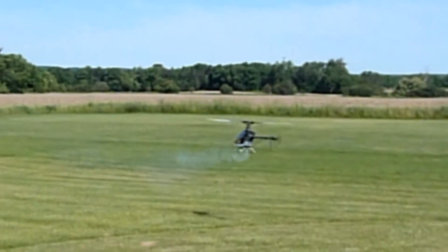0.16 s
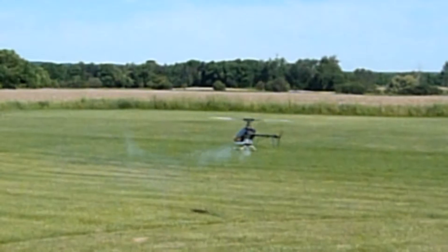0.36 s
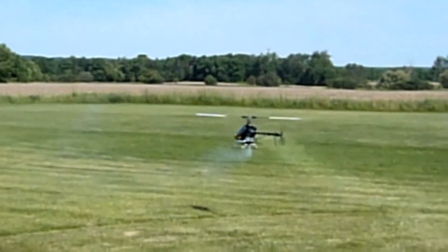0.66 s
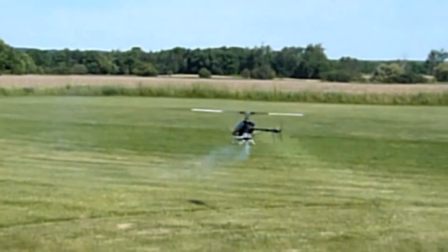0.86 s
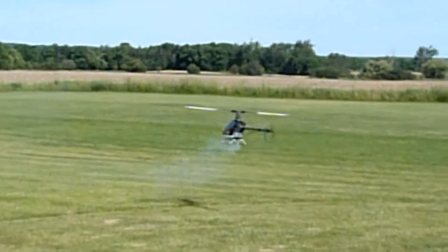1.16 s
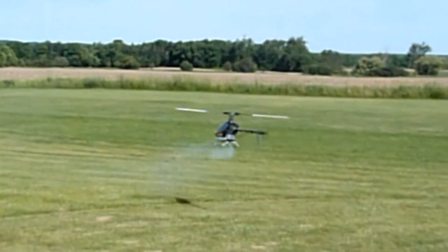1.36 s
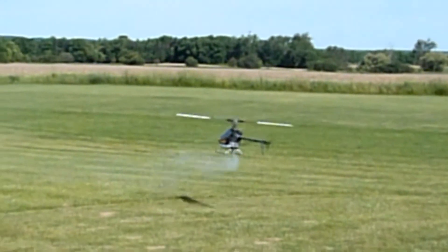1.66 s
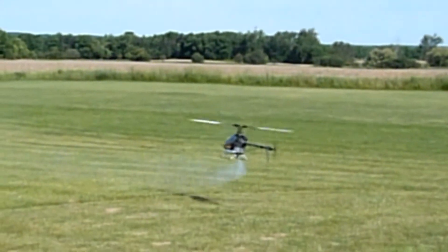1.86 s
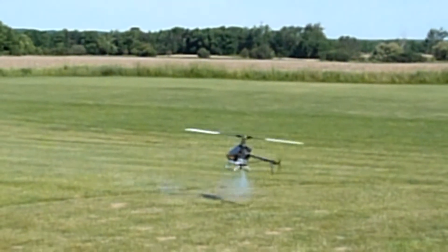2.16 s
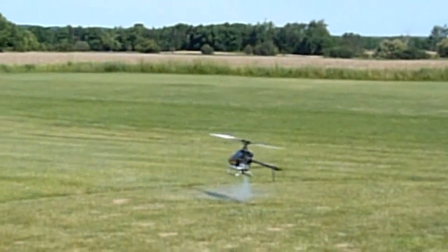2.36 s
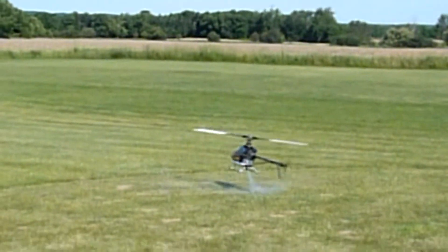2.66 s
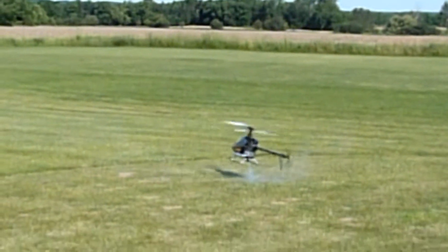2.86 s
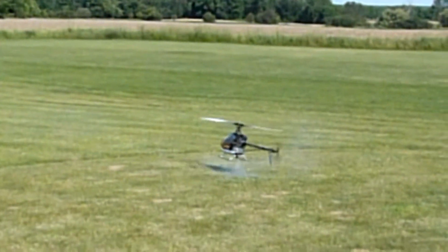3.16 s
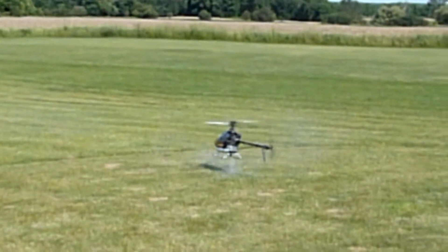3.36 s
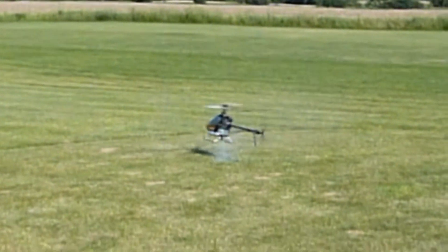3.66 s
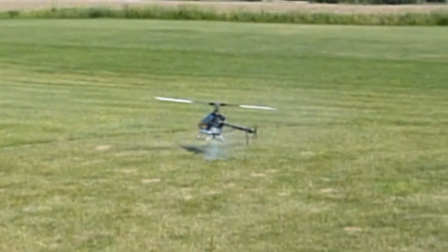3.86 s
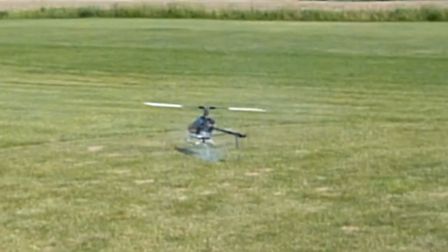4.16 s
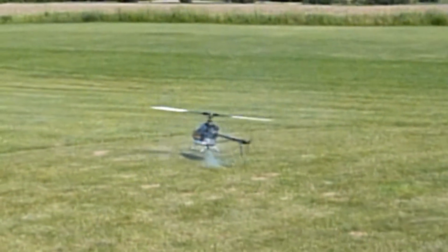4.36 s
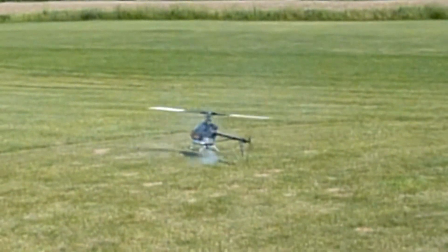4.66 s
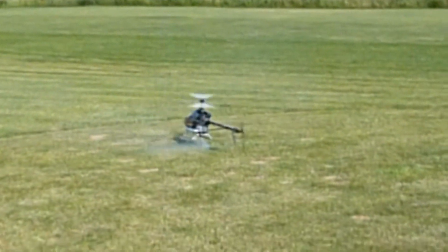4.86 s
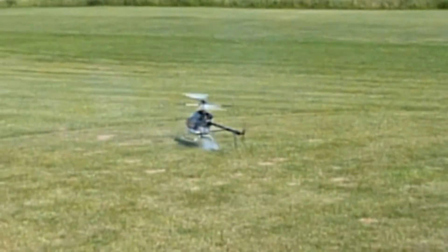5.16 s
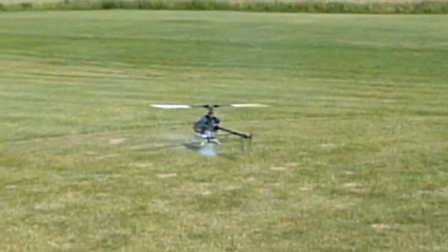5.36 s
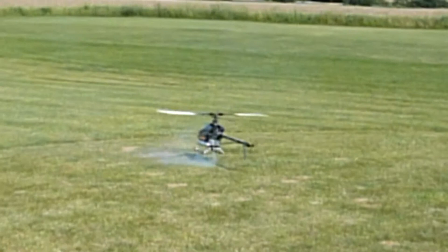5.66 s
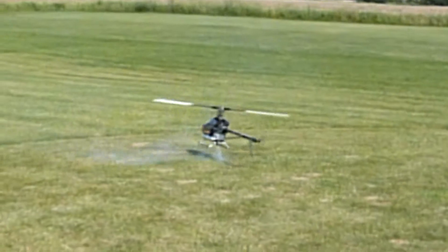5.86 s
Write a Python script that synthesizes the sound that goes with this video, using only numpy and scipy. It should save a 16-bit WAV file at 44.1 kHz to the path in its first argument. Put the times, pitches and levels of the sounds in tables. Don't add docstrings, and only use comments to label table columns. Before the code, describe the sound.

On an open grass field a model helicopter sinks to a low hover. Its small two-stroke holds a nearly constant buzzing drone with a piercing gear whine and bright blade hiss. Gusts rumble, flutter and pop right on the small stereo microphone, heavily for nearly three seconds, then dropping away and returning in shorter bouts. The hiss swells late as the craft turns.

```python
import sys
import numpy as np
from scipy import signal
from scipy.fft import rfft, irfft, next_fast_len
from scipy.io import wavfile
from scipy.ndimage import uniform_filter1d, map_coordinates

SR = 44100
rng = np.random.default_rng(int(sys.argv[2]) if len(sys.argv) > 2 else 0)


def wrap_up_sound(samples):
    columns = np.atleast_2d(samples).T
    tamed = np.clip(columns, -1, 1)
    steps = np.round(tamed * 32767).astype(np.int16)
    wavfile.write(sys.argv[1], SR, steps)


def volts(x):
    e = np.asarray(x, float) / 20
    return 10 ** e


N = 264851
TIME = np.arange(N) / SR
GEAR_RATIO = 8.5


def unit(x):
    return x / np.sqrt(np.mean(x ** 2) + 1e-20)


def along(points, hz):
    f, v = np.transpose(points)
    return np.interp(np.log(hz + 1), np.log(f + 1), v)


def curves(rows):
    s, *cols = np.transpose(rows)
    return [np.interp(TIME, s, c) for c in cols]


def wobble(rate):
    knots = rng.standard_normal(int(N * rate / SR) + 4)
    return map_coordinates(knots, [TIME * rate], order=2)


def filtered(x, response):
    m = next_fast_len(N + 8192)
    spectrum = rfft(x, m) * response(np.fft.rfftfreq(m, 1 / SR))
    return irfft(spectrum, m)[..., :N]


# time in seconds, engine speed in turns per second.
ENGINE_SPEED = [(0, 234.3), (.25, 235.5), (.5, 236.2), (.75, 237), (1, 237.9), (1.25, 238.8), (1.6, 239.2),
                (2.2, 239.6), (2.7, 239.2), (3, 240), (3.8, 240.4), (4.3, 240.5), (4.5, 240.2),
                (4.9, 240.6), (5.25, 240), (5.6, 240.3), (6, 240.7)]
# time in seconds, nearness to the grass from 0 (high) to 1 (low hover).
NEARNESS = [
    (0, 0),
    (1.5, 0.11),
    (2.2, 0.3),
    (3, 0.79),
    (4, 0.94),
    (6, 1),
]
# time in seconds, loudness in dB, # gear load in dB, throttle
# in dB.
CRAFT_LEVEL = [(0, -49, 5, -1), (.22, -44.5, 5.5, -2), (.42, -47, 5, -2), (1.02, -44.5, 1.5, -0.9),
               (1.55, -47.5, 1, 0.5), (1.87, -45, 5, 0), (2.07, -43.5, .3, 2), (2.55, -48, 2.5, 1.5),
               (3.47, -40.5, -2, -3), (3.64, -44, -1, -0.3), (3.9, -40, 0, -0.1), (4.17, -43.5, -3, .3),
               (4.45, -39, -3, -2.5), (4.66, -40.5, 1.5, -4), (5.12, -34.5, 2, -0.5),
               (5.27, -42, -1, -1.5), (5.55, -44, 4.5, -1), (5.95, -35.5, -5.5, 1)]


def helicopter():
    turn = 2 * np.pi * np.cumsum(curves(ENGINE_SPEED)[0]) / SR
    near = np.clip(curves(NEARNESS)[0], 0, 1)
    hiss_db, gear_db, throttle_db = curves(CRAFT_LEVEL)
    engine_db = -47 + 0.54 * (hiss_db + 44.5) + 2 * near + throttle_db + 0.29 * wobble(9.9)
    whine_db = hiss_db + gear_db + 0.74 * wobble(10)
    rising_db = engine_db + wobble(7) - 8.5 + 11.5 * near
    hiss_db = hiss_db + 0.72 * wobble(11)

    drag = np.cos(turn / GEAR_RATIO + 1.25 + 0.3 * wobble(3))
    shake = backlash(drag, near)
    tones = exhaust(turn, near) + volts(engine_db + 1.0) * engine_orders(turn, near, drag)
    tones = tones + volts(whine_db - 1.15) * gear_whine(turn, near, shake)
    tones = tones + volts(rising_db) * rising_order(turn, shake)

    noise = volts(engine_db - 3.0) * (0.46 + 0.61 * near) * stutter(turn)
    noise = noise + volts(hiss_db + 2) * hiss(turn, near)
    return tones * volts([[-0.3], [0.3]]) + grass(noise, loss_db=-9, soft_hz=5030)


# time in seconds, level in dB.
EXHAUST_LEVEL = [
    (0, -36.5),
    (2.9, -45),
    (3.15, -40.5),
    (4.7, -37),
    (5.1, -33),
    (5.3, -36),
    (5.6, -39),
    (5.9, -34.5),
    (6, -35.5),
]


def exhaust(turn, near):
    return volts(curves(EXHAUST_LEVEL)[0]) * lines(slice(0, 3), turn, near, 0.04 * wobble(30), sway_db=0.8)


def engine_orders(turn, near, drag):
    return lines(slice(3, 13), turn, near, 0.06 * drag + 0.02 * wobble(9), sway_db=1.2)


def backlash(drag, near):
    return (0.08 - 0.045 * near) * drag + (0.04 + 0.035 * near) * wobble(45) + 0.035 * wobble(170)


def gear_whine(turn, near, shake):
    depth = 0.38 - 0.1 * near + 0.08 * wobble(2.5)
    beat = 1 + depth * np.cos(turn / GEAR_RATIO + 1.25)
    return beat * volts(1.6 * wobble(120)) * lines(slice(13, None), turn, near, shake, sway_db=1.5)


def rising_order(turn, shake):
    return volts(3 * wobble(60)) * np.sin(21 * (turn + 0.5 * shake + 0.075 * wobble(60)))


TONE_MULTIPLES = [1, 2, 3, 4, 5, 6, 7, 8, 9, 81 / 8.5, 10, 11, 12, 15, 16, 17, 18, 20, 22, 23]
# level in dB when high, level in dB when low.
TONE_LEVELS = [(-43, -36), (-54, -47), (-56, -49), (-59, -62), (-52, -56), (-65, -60), (-52, -46),
               (-66, -60), (-65, -51), (-62, -49), (-60, -56), (-67, -59), (-74, -65), (-60, -60),
               (-60, -52), (-67, -58), (-72, -62), (-46, -44), (-60, -57), (-63, -55)]


def lines(part, turn, near, wander, sway_db):
    total, power = 0, 0
    for k, (high_db, low_db) in zip(TONE_MULTIPLES[part], TONE_LEVELS[part]):
        size = volts(high_db + (low_db - high_db) * near)
        tone = np.sin(k * (turn + wander) + rng.uniform(0, 2 * np.pi))
        total = total + size * volts(sway_db * wobble(9)) * tone
        power = power + size ** 2 / 2
    return total / np.sqrt(power)


# multiple of engine speed, level in dB when low.
UNEVEN_FIRING = [(1.5, -14.5), (2.5, -8), (4.5, -17), (5.5, -7), (6.5, -7), (7.5, -7), (11.5, -9.5),
                 (12.5, -14.5), (15.5, -13), (17.5, -26)]


def stutter(turn):
    total = 0
    for k, db in UNEVEN_FIRING:
        rate = 20 + 4 * k
        total = total + volts(db) * (wobble(rate) * np.sin(k * turn) + wobble(rate) * np.cos(k * turn))
    return total


# frequency in Hz, density in dB per Hz.
HISS_WHEN_HIGH = [(60, -29), (300, -9), (900, -3.5), (1700, 1), (2000, -4), (2400, -5.5), (3200, -11.5),
                  (3700, -8), (4450, -1.5), (5300, 4.5), (5700, -8.5), (9000, -10.5), (12600, -10.5),
                  (13800, -12.5)]
# frequency in Hz, density in dB per Hz.
HISS_WHEN_LOW = [(60, -4), (300, -5), (900, -12.5), (1700, -2.5), (2000, -6), (2300, 2.5), (2550, -8.5),
                 (3800, -5.5), (4400, -2), (5450, 5.5), (5750, -7), (9000, -10.5), (12600, -12),
                 (13800, -30)]
# frequency in Hz, left-right likeness from 0 to 1.
HISS_LIKENESS = [(300, 1), (2800, 0.95), (6000, 0.84), (11000, 0.91), (13000, 0.65)]
# centre in Hz, width in Hz, lift in dB when high, lift
# in dB when low.
HISS_PEAKS = [(5890, 130, 9, 7), (6290, 180, 5, 6), (7030, 410, 7.5, 3.5), (7540, 250, 1.5, 0.5),
              (8530, 560, 5.5, 4.5), (9405, 660, 8.5, 8), (10020, 970, 5.5, 7.5), (11460, 350, 4.5, 3),
              (12700, 630, -3, 4)]
# centre in Hz, width in Hz, depth in dB.
CANOPY_DIP = (5225, 150, -9)


def hiss(turn, near):
    firing_db = 0.84 * np.sin(turn) + 2.9 * np.sin(2 * turn)
    blade_db = 1.6 * np.sin(4 * turn / GEAR_RATIO)
    puff = volts(firing_db + blade_db + 0.54 * wobble(600) + 0.88 * wobble(6.4))

    def coloured(points, lift_column):
        def response(hz):
            dip_hz, dip_width, dip_db = CANOPY_DIP
            db = along(points, hz) + dip_db / (1 + (2 * (hz - dip_hz) / dip_width) ** 4)
            for ring in HISS_PEAKS:
                db = db + ring[lift_column] / (1 + (2 * (hz - ring[0]) / ring[1]) ** 2)
            twist = np.arccos(np.clip(along(HISS_LIKENESS, hz), -1, 1)) / 2
            return volts(db) * [np.cos(twist), np.sin(twist)]
        return unit(filtered(puff * rng.standard_normal((2, N)), response))

    high = coloured(HISS_WHEN_HIGH, 2)
    low = coloured(HISS_WHEN_LOW, 3)
    mid, side = np.sqrt(1 - near) * high + np.sqrt(near) * low
    return patchy(np.array([mid + side, mid - side]), depth_db=1.2)


def patchy(x, depth_db):
    z = signal.stft(x, nperseg=512)[2]
    field = rng.standard_normal(z.shape[1:])
    field = uniform_filter1d(field, size=7, axis=0)
    field = uniform_filter1d(field, size=22, axis=1)
    return signal.istft(z * volts(depth_db * unit(field)), nperseg=512)[1][:, :N]


# time in seconds, extra delay in milliseconds.
GROUND_DELAY = [
    (0, 0.38),
    (.7, 0.27),
    (1.5, 0.28),
    (2.2, 0.2),
    (3, 0.29),
    (6, 0.27),
]


def grass(x, loss_db, soft_hz):
    late = np.arange(N) - curves(GROUND_DELAY)[0] * SR / 1000
    dull = filtered(x, lambda hz: 1 / (1 + (hz / soft_hz) ** 4))
    echo = np.array([map_coordinates(c, [late], order=3) for c in dull])
    return x + volts(loss_db) * echo


# frequency in Hz, density in dB per Hz.
BREEZE_COLOUR = [(20, -24), (60, 2), (130, 7), (200, -31), (400, -30)]


def wind():
    eddy = 1.35 * wobble(70) + 2.24 * np.array([wobble(60), wobble(60)])
    spike = 3.65 * wobble(170) + 2.76 * np.array([wobble(200), wobble(200)])

    def under(hz, edge_hz):
        return 1 / np.sqrt(1 + (hz / edge_hz) ** 8)

    def over(hz, edge_hz):
        return np.sqrt(1 - under(hz, edge_hz) ** 2)

    rumble = strength(3.5, 0.8, -0.48, 1.5)
    body = strength(5.5, 1.12, 0.53, 0.5)
    flutter = strength(-3.5, 1.07, 0.95, 0)
    layers = [(rumble, eddy, lambda hz: under(hz, 206.6)),
              (body, 0.79 * eddy + 0.6 * spike, lambda hz: over(hz, 210) * under(hz, 480)),
              (flutter, 1.35 * eddy + spike, lambda hz: over(hz, 509))]
    breeze = volts(2 * wobble(10)) * rng.standard_normal((2, N))
    out = volts(-57) * unit(filtered(breeze, lambda hz: volts(along(BREEZE_COLOUR, hz))))
    for gain, lump_db, band in layers:
        out = out + ports(volts(lump_db + [[-0.3], [0.3]]), gain, band)
    return out


# time in seconds, strength in dB.
STEADY_FLOW = [(0, -28.5), (.3, -32), (.75, -29), (.82, -37.5), (1.22, -27), (1.36, -29.5), (1.42, -36),
               (2.89, -34), (2.905, -72), (3.12, -68), (3.4, -38), (4.6, -38.5), (4.66, -52), (4.94, -60),
               (5.0, -45.5), (5.56, -38), (5.66, -71), (6.01, -52)]
# peak time in seconds, strength in dB, half length in seconds,
# sharpness in dB.
GUST_EVENTS = [(0.115, -27.5, 0.027, 2.5), (0.231, -28, 0.035, 9), (0.502, -27, 0.053, 2),
               (0.915, -33, 0.11, 7), (1.052, -29, 0.03, 5), (1.471, -23.5, 0.038, 2.5),
               (1.56, -27.5, 0.037, -7), (1.657, -24.5, 0.05, 4.5), (1.746, -23.5, 0.024, 1),
               (1.883, -25, 0.062, 0.3), (2.085, -30, .06, -8), (2.248, -24.5, 0.053, -0.5),
               (2.347, -23.5, 0.019, 0), (2.424, -23.5, 0.048, 3), (2.535, -27.5, .06, -2.5),
               (2.79, -29.5, .04, -5.5), (3.236, -30.5, 0.023, -2), (3.383, -32, 0.054, -15),
               (3.586, -26.5, 0.13, -1.5), (3.813, -25.5, .04, -8), (3.988, -30.5, .05, -10.5),
               (4.104, -24.5, 0.028, -9), (4.183, -27.5, 0.031, -3.5), (4.278, -26.5, 0.028, -5.5),
               (4.543, -28.5, 0.042, -1.5), (5.04, -38, 0.056, -10), (5.217, -27, 0.065, -10),
               (5.377, -24, 0.063, 1), (5.503, -27.5, 0.023, -2), (5.864, -48, 0.024, -14)]


def strength(offset_db, grows, sharp_share, flow_db):
    power = volts(grows * (curves(STEADY_FLOW)[0] + 31) + flow_db) ** 2
    for s, db, half_s, sharp_db in GUST_EVENTS:
        fall_db = 10 * (np.abs(TIME - s) / half_s) ** 1.39
        power = power + volts(grows * (db + 29.5 - fall_db) + sharp_share * sharp_db) ** 2
    return volts(offset_db - 30.5) * np.sqrt(power)


# frequency in Hz, density in dB per Hz.
BUFFET_COLOUR = [(12, -49), (20, -22.5), (107, -5.5), (204, -3.5), (398, -1), (561, -4.5), (608, -5.5),
                 (700, -8.5), (1360, -23.5), (2500, -43.5), (3250, -57), (5500, -120)]
# frequency in Hz, in-phase part over anti-phase part in dB.
PORTS_SHARE = [(25, 6.5), (125, 1.5), (250, 0), (500, -6), (1000, -7)]


def ports(lumps, gain, band):
    left, right = gain * lumps * rng.standard_normal((2, N))

    def colour(hz):
        return band(hz) * volts(along(BUFFET_COLOUR, hz) + [along(PORTS_SHARE, hz), 0 * hz])

    mid, side = filtered(np.array([left + right, left - right]), colour)
    colour_power = np.mean(colour(np.arange(1, SR // 2)) ** 2)
    scale = 2 * np.sqrt(np.mean(lumps ** 2) * colour_power)
    return np.array([mid + side, mid - side]) / scale


# time in seconds, peak in dB, left over right in dB,
# tick on the edge in dB.
EDDY_POPS = [(0.105, -21.5, -6, -24), (0.234, -16.5, 8, .3), (0.402, -30, 6, -14), (0.548, -20.5, -1, -14),
             (0.635, -20.5, -2, -12), (0.673, -24, -5, -15), (0.91, -24, -2, -10), (0.961, -24, -1.5, -16),
             (1.047, -20.5, -4, -14), (1.207, -22, 2, -17), (1.327, -28, -3, -17), (1.387, -28, 3, -15),
             (1.447, -22, 4, -15), (1.55, -25, -3, -22), (1.668, -13.5, 1, -24), (1.742, -18.5, -1, -19),
             (1.884, -28, 4, -12), (2.11, -24, -1, -15), (2.346, -25, 1.5, -20), (2.392, -34, 4, -9),
             (2.504, -25.5, 2.5, -11), (3.514, -22.5, -3, -9), (3.551, -33, 1.5, -14),
             (3.611, -19, .3, -20), (4.188, -29, -3, -9), (5.328, -30, 2, -9), (5.377, -25, 8, -16),
             (5.406, -29, -0.3, -11), (5.441, -19, -1.5, -19), (5.508, -22, -2, -21)]


def pops():
    out = np.zeros((2, N + SR))
    t = np.arange(SR // 40) / SR
    for s, db, pan_db, tick_db in EDDY_POPS:
        size, skew = rng.standard_normal(2)
        pop_hz = 364 * (1 + 0.13 * size + 0.021 * (tick_db + 14.5))
        u = t * pop_hz
        shift = (0.99 + 0.058 * skew) * np.array([[1], [-1]])
        push = u * 11 * np.exp(-4.1 * u) * np.sin(2 * np.pi * u + shift)
        tick = 4200 * t * np.exp(-t / 0.00036) * np.sin(2 * np.pi * 1600 * t)
        level = volts(db + 13.0 + np.array([[pan_db], [-pan_db]]) / 2)
        start = round((s + 0.0007) * SR)
        out[:, start:start + len(t)] += level * (push + volts(tick_db - 15.5) * tick)
    return filtered(out[:, :N], lambda hz: 1j * hz / (150 + 1j * hz))


def scene():
    return helicopter() + wind() + pops()


def microphones(x):
    def tilt(hz):
        tilt_db = along([(4000, -0.029), (8000, -0.23), (13000, 1.2)], hz)
        return volts(np.array([[1], [-1]]) * tilt_db) * hz ** 2 / (hz ** 2 + 30 ** 2)
    return filtered(x, tilt)


# start in seconds, end in seconds.
TOP_BAND_OPEN = [(3.17, 3.24), (3.33, 3.39), (3.83, 3.93), (3.96, 4.03), (4.05, 4.1), (4.13, 4.17),
                 (4.22, 4.41), (4.56, 4.6), (4.7, 4.74), (4.88, 5.23), (5.66, 5.76), (5.78, 5.9),
                 (5.92, 5.97)]
# start in seconds, end in seconds.
TOP_BAND_CUT = [
    (1.45, 1.61),
    (2.41, 2.48),
    (2.52, 2.57),
    (2.7, 2.74),
]


def treble_limit(x):
    hz, t, z = signal.stft(x, SR, nperseg=1024)

    def within(spans):
        return np.any([(t > a) & (t < b) for a, b in spans], axis=0)

    top_hz = np.where(within(TOP_BAND_OPEN), 13700, np.where(within(TOP_BAND_CUT), 12250, 12900))
    flicker = rng.random(len(t)) < np.where(top_hz > 13000, 0.3, 0.06)
    top_hz = top_hz - 330 * flicker
    return signal.istft(z * (hz[:, None] < top_hz), SR, nperseg=1024)[1][:, :N]


def roll_off(x):
    return signal.sosfilt(signal.butter(12, 13690, fs=SR, output="sos"), x)


def record(dry):
    mix = treble_limit(microphones(dry))
    return roll_off(mix)


dry = scene()
out = record(dry)
wrap_up_sound(out)
```